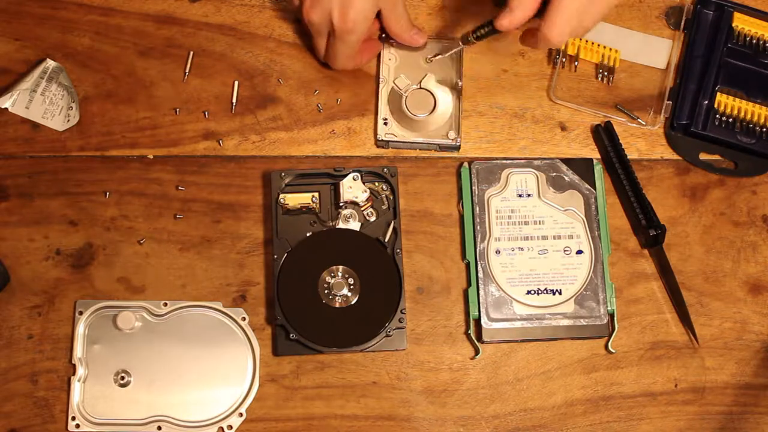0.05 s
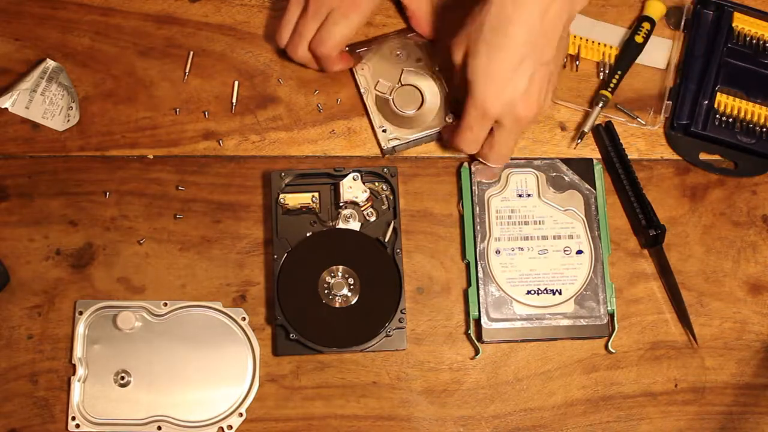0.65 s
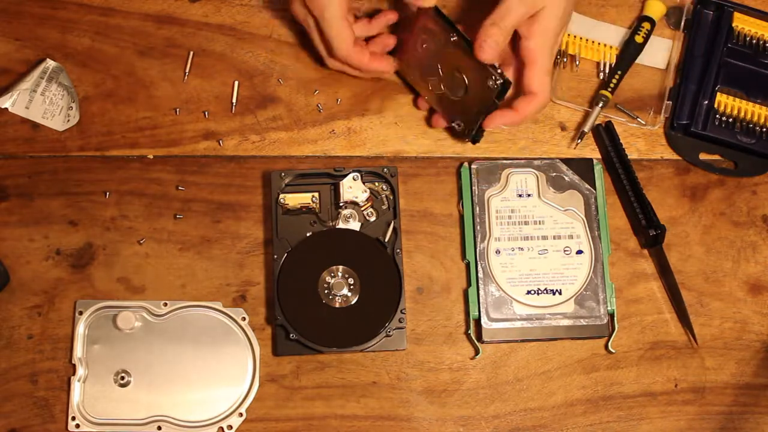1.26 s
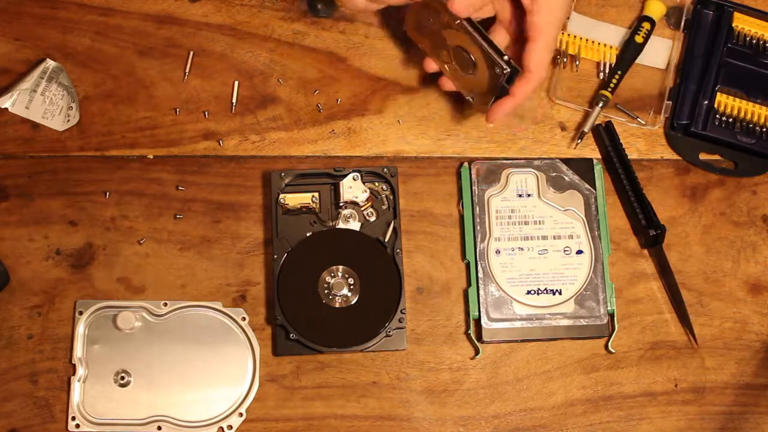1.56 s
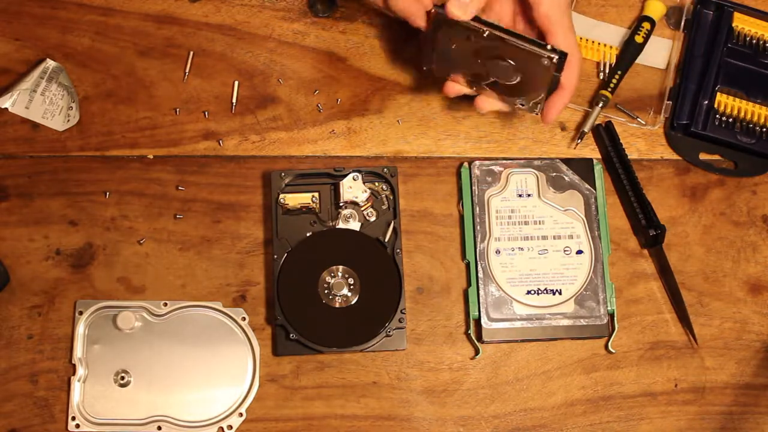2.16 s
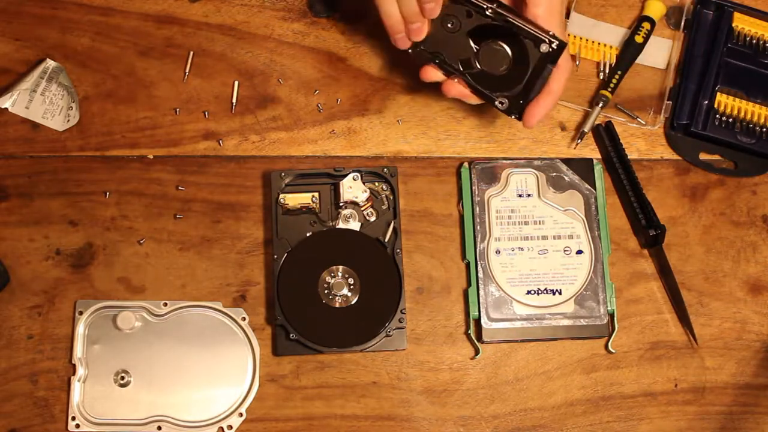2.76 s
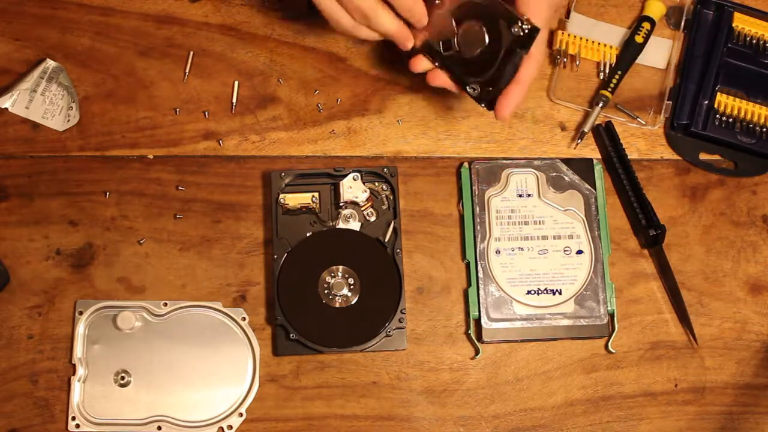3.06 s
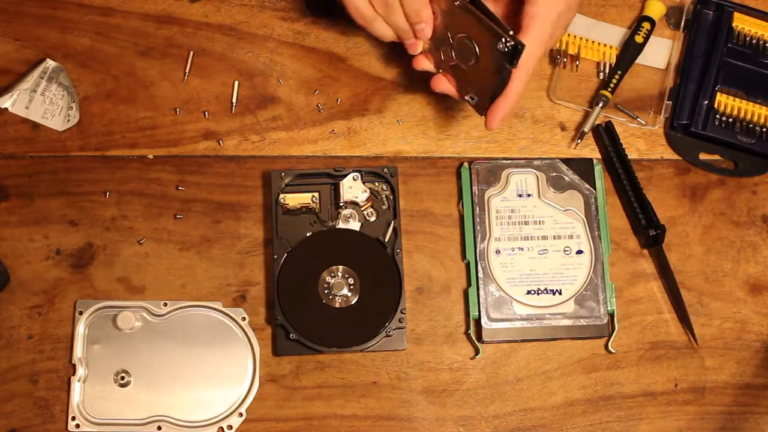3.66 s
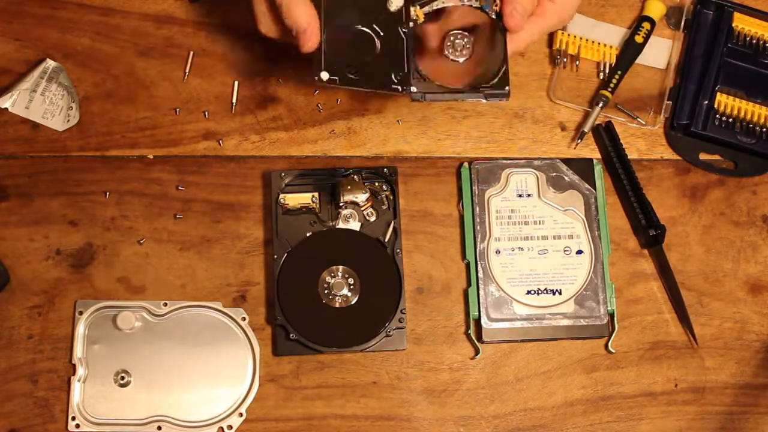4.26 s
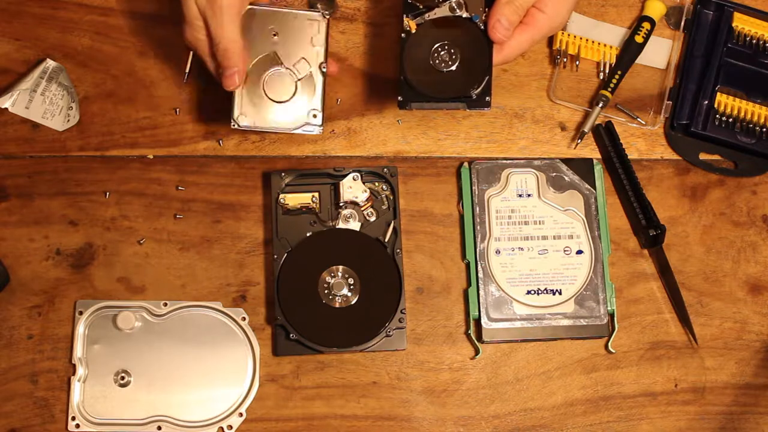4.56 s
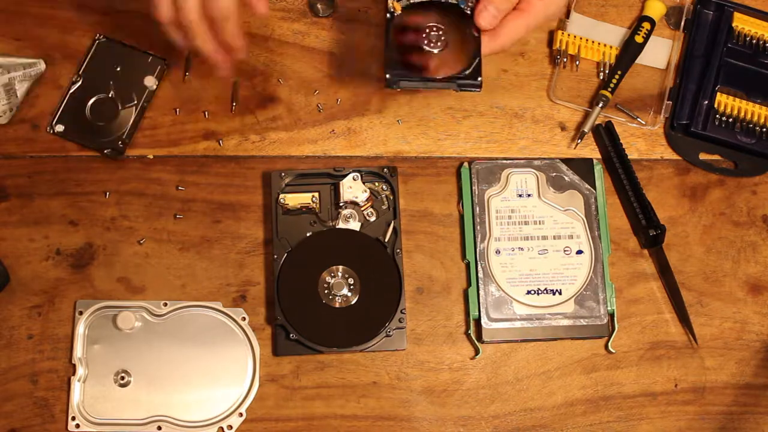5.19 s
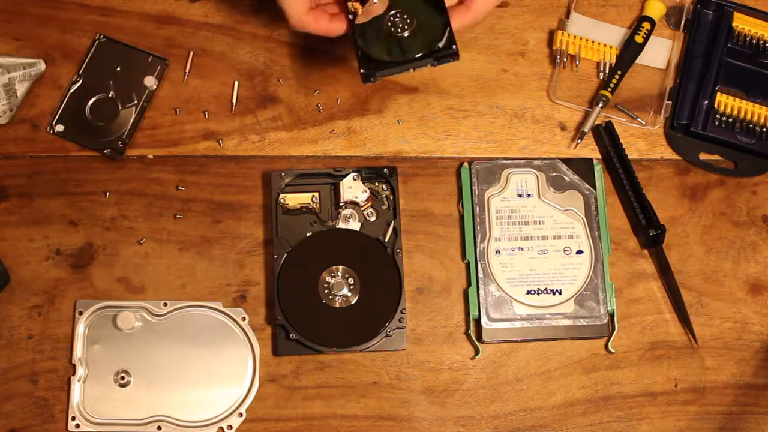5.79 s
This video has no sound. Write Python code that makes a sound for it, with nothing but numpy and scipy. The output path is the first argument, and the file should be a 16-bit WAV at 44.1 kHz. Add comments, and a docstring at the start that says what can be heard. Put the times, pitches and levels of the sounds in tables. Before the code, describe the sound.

Close taps, clicks and sharp snaps as a small disk drive is prised open, ending in a metallic clink over faint fan hum.

```python
"""Small room, wooden table, faint fan hum. A small screwdriver is put down and rattles on its bits.
A small disk drive is picked up, turned in the hands and its cover prised off with sharp snaps;
the thin metal cover is laid down and clinks. Each contact is a noise crack, a ping and the ringing
modes of the body; sliding is a dense run of tiny slips."""
import sys
import numpy as np
from scipy import signal
from scipy.fft import rfft, irfft
from scipy.io import wavfile
from scipy.ndimage import uniform_filter1d

SR = 44100
rng = np.random.default_rng(int(sys.argv[2]) if len(sys.argv) > 2 else 0)


def digitize_waveform(pressure):
    """Quantize a signal to 16-bit integers and store it at the path in sys.argv[1].

    Rows of a 2-D input are taken as channels; values are limited to [-1, 1].
    """
    field = np.atleast_2d(pressure).T
    bounded = np.clip(field, -1, 1)
    quanta = np.round(bounded * 32767).astype(np.int16)
    wavfile.write(sys.argv[1], SR, quanta)


N = 257103

# wooden table modes: f/Hz, level/dB, t60/s
TABLE_MODES = [(394, -3.5, 0.082), (650, -14, 0.06), (780, -17, 0.046), (1080, -1, 0.029),
               (1520, -3, 0.0083), (1720, -1.5, 0.034), (2690, 1, 0.02), (3240, 0, 0.017), (3995, -3, 0.04),
               (4870, -16, 0.049)]


def from_db(db):
    """Decibels to gain."""
    return 10 ** (np.asarray(db) / 20)


def rms_one(x):
    """Scale to rms 1."""
    return x / np.sqrt(np.mean(x ** 2) + 1e-20)


def decay(t, t60_s):
    """Exponential fall, 60 dB in t60_s."""
    return from_db(-60 * t / t60_s)


def butter(x, hz, kind="band", order=2):
    """Butterworth filter."""
    return signal.sosfilt(signal.butter(order, hz, kind, fs=SR, output="sos"), x)


def resonance(x, hz, width_hz):
    """Two-pole resonance, peak gain 1."""
    r = np.exp(-np.pi * width_hz / SR)
    feedback = [1, -2 * r * np.cos(2 * np.pi * hz / SR), r * r]
    return signal.lfilter(np.array([1, 0, -1]) * (1 - r * r) / 2, feedback, x)


def add(out, start_s, sound):
    """Mix a sound in at start_s."""
    at = round(start_s * SR)
    out[at:at + len(sound)] += sound[:N - at]


def balanced(x, levels_db, samples):
    """Set bass, mid and treble rms, taken over the first samples."""
    # bass, mid, treble: low/Hz, high/Hz
    bands = [(330, 2000), (2000, 6500), (6500, 17000)]
    parts = [butter(butter(x, edges), edges) for edges in bands]
    return sum(from_db(db) * part / np.std(part[:samples]) for db, part in zip(levels_db, parts))


def room_air():
    """Steady, smooth hiss at rms 1."""
    # air spectrum: f/Hz, relative density/dB
    spectrum = [(15, -62), (25, -24.5), (97, -22), (149, -7), (212, -15), (270, -2.5), (326, -11.5),
                (439, -12), (591, -15), (911, -8), (1130, -11.5), (1650, -9), (2000, -12.5), (4250, -13.5),
                (16000, -23)]
    points_hz, levels_db = np.transpose(spectrum)
    hz = np.maximum(np.fft.rfftfreq(N, 1 / SR), 1)
    gain = from_db(np.interp(np.log(hz), np.log(points_hz), levels_db))
    return rms_one(irfft(rfft(rng.standard_normal(N)) * gain, N))


def fan():
    """Fan noise through the narrow resonances of its housing."""
    # housing resonances: f/Hz, nominal width/Hz, level/dB
    peaks = [(142.6, 7.3, -68.5), (276.4, 27, -68.5), (421, 55, -72), (887, 73, -87), (1364, 33, -67.5),
             (1661, 20, -68.5), (1782.4, 30, -66), (2784, 57, -70.5)]
    out = np.zeros(N)
    for hz, width_hz, db in peaks:
        hum = resonance(rng.standard_normal(N), hz, 1.1 * width_hz)
        out += from_db(db) * rms_one(resonance(hum, hz, 1.1 * width_hz))
    return out


def drone(hz):
    """A faint low tone comes and goes."""
    # drone envelope: t/s, rms level/dB
    envelope = [(1.25, -92), (1.36, -69.5), (1.8, -63.5), (1.9, -76), (2.03, -68.5), (2.3, -61),
                (2.45, -95)]
    t = np.arange(N) / SR
    return from_db(np.interp(t, *np.transpose(envelope))) * np.sqrt(2) * np.sin(2 * np.pi * hz * t)


def room_reverb(x, early_db, early_t60_s, late_db):
    """Near echoes, quick scatter from clutter, then a short tail that dies first in the treble."""
    # room tail: f/Hz, t60/s, level/dB
    tail = [(398, .35, -3.5), (1190, 0.26, 3.5), (3430, 0.29, 0), (8100, 0.27, -4.5), (14900, 0.2, -4)]
    # echoes off the table and nearby things: t/s, level/dB
    echoes = [(.0045, -31), (.0085, -31), (0.01, -16.5)]
    t = np.arange(SR // 2) / SR
    response = np.zeros(len(t))
    edges_hz = np.geomspace(200, 18000, num=10)
    points_hz, t60s, levels_db = np.transpose(tail)
    for low, high in zip(edges_hz, edges_hz[1:]):
        log_centre = np.log(low * high) / 2
        t60_s = np.interp(log_centre, np.log(points_hz), t60s)
        db = np.interp(log_centre, np.log(points_hz), levels_db)
        fade = from_db(early_db) * decay(t, early_t60_s) + from_db(late_db) * decay(t, t60_s)
        response += from_db(db) * fade * butter(rng.standard_normal(len(t)), (low, high))
    response *= np.clip((t - .004) / .002, 0, 1)  # 4 ms pre-delay
    for delay_s, db in echoes:
        response[round(delay_s * SR)] += from_db(db)
    return signal.fftconvolve(x, response)[:N]


def sliding(grain_db, focus_db, wood_db, lift_s):
    """Tiny uneven slips swell, fade and stir the wood; less bass once the drive is lifted."""
    # fingers and parts sliding: start/s, end/s, mid level/dB, treble re mid/dB, favoured f/Hz
    rubs = [(0, 0.065, -49, 2, 4030), (0.322, 0.43, -51, -7, 3960), (0.696, .72, -51, -13, 1542),
            (0.859, 0.897, -52, -2, 2787), (1.063, 1.241, -57, 1, 3310), (1.489, 1.64, -56.5, 5, 10420),
            (3.181, 3.231, -54.5, -1.5, 4220), (3.537, 3.88, -64, 3, 4800), (3.886, 3.914, -37, -8.5, 4750),
            (4.203, 4.26, -53.5, -11, 5200), (4.845, 4.892, -68.5, 18, 9300)]
    out = np.zeros(N)
    for start_s, end_s, db, treble_db, pitch_hz in rubs:
        n = round((end_s - start_s) * SR)
        noise = rng.standard_normal(n)
        grain = rms_one(uniform_filter1d(rng.standard_normal(n), size=60))
        slips = noise * from_db(grain_db * grain)
        focus = resonance(slips, pitch_hz, width_hz=.17 * pitch_hz)
        wood = sum(from_db(mode_db) * resonance(slips, hz, 5 / t60) for hz, mode_db, t60 in TABLE_MODES)
        rub = slips + from_db(focus_db) * focus + from_db(wood_db) * wood
        rub *= signal.windows.tukey(n, .5)
        bass_db = -1.5 if start_s < lift_s else -19
        bass_db -= 8.5 * np.log2(pitch_hz / 4000)  # a lower, heavier scrape has more bass
        add(out, start_s, balanced(rub, (db + bass_db, db, db + treble_db), samples=n))
    return out


def bouncing(rows, bounces=2, loss_db=7, gap_ratio=.9, rebound_t60_s=.0088):
    """One row per contact; gaps over 2 ms add crisp rebounds, each weaker and sooner."""
    contacts = []
    for at_s, db, treble_db, t60_s, ping_hz, ping_db, gap_s in rows:
        contacts.append((at_s, db, treble_db, t60_s, ping_hz, ping_db))
        for k in range(bounces if gap_s > .002 else 0):
            at_s += gap_s * gap_ratio ** k
            contacts.append((at_s, db - (k + 1) * loss_db, treble_db, rebound_t60_s, ping_hz, ping_db))
    return contacts


def strikes(contacts, modes, colour, ring_db, lowest_hz, soft_hz, rise_s, bass_db, bass_db_per_db,
            ping_width_hz):
    """Each contact cracks, pings and rings the body's modes; harder means more treble, less bass."""
    out, t = np.zeros(N), np.arange(SR // 8) / SR
    for at_s, db, treble_db, t60_s, ping_hz, ping_db in contacts:
        force = (decay(t, t60_s) + decay(t, .0025)) * (1 - np.exp(-t / rise_s))
        crack = rng.standard_normal(len(t)) * force
        ping = np.sin(2 * np.pi * ping_hz * t) * np.exp(-np.pi * ping_width_hz * t)
        ping *= np.linalg.norm(crack) * 2 * np.pi * ping_width_hz / SR  # peak level with crack spectrum
        sound = crack + from_db(ping_db) * ping
        for hz, width_hz, hump_db in colour:
            sound += (from_db(hump_db) - 1) * resonance(sound, hz, width_hz)
        for hz, mode_db, mode_t60_s in modes:
            strength = from_db(mode_db + ring_db + rng.normal(0, .48)) * rng.choice([-1, 1])
            sound += strength * np.sin(2 * np.pi * hz * t) * decay(t, mode_t60_s)
        sound = butter(sound, soft_hz, "low")  # soft contact: little treble
        sound = butter(sound, lowest_hz, "high", order=4)  # small body: little bass
        levels_db = (db + bass_db + bass_db_per_db * treble_db, db, db + treble_db)
        add(out, at_s, balanced(sound, levels_db, samples=SR // 200))
    return out


def finger_ticks(start_s, end_s, per_s):
    """Contact rows: fingers tick faintly on the case at random moments."""
    treble_db, t60_s, ping_hz, ping_db = -1, .012, 4560, 13
    draws = rng.uniform(-1.1, 1, (round(per_s * (end_s - start_s)), 2))
    return [(start_s + (end_s - start_s) * (when + 1) / 2, db, treble_db, t60_s, ping_hz, ping_db)
            for when, db in draws + (0, -57)]  # about -57 dB


def table_taps():
    """Screwdriver and drive knock on the table; the wood rings."""
    # knocks: t/s, mid level/dB, treble re mid/dB, crack t60/s, ping f/Hz, ping/dB, bounce gap/s
    knocks = [(0.0237, -38.5, 0, 0.012, 2800, 10, 0.00038), (0.0424, -37.5, -13, 0.02, 3670, 18, 0.00057),
              (0.0565, -35, -6.5, 0.011, 4080, 14, 0), (0.0927, -50, 1, .012, 2730, 13, 0.00039),
              (0.1585, -45.5, -8, .036, 1680, 19, 0), (0.1718, -42, -15, .007, 2680, 15, 0.0005),
              (0.4304, -34.5, 3, .0086, 5500, 14, 0.0017), (0.4717, -33, -11, .075, 4238, 7, 0.00041),
              (0.4782, -38, 1, .007, 8800, 8, 0), (0.4828, -28.5, 3.5, 0.042, 8526, 10, 0.0018),
              (0.4925, -35, 6, .0083, 9780, 14, .015), (0.5318, -39, 14, .06, 9800, -9, 0),
              (0.5376, -32, 7, .028, 9600, 8, .018), (0.6982, -45.5, -3, 0.023, 700, 13, 0.0021),
              (0.7349, -44.5, -6, .017, 4220, 9, 0.00015), (0.7743, -41, -15, 0.019, 2730, 16, 0.00032),
              (0.8788, -24.5, -8, 0.019, 3280, 5.5, 0)]
    # humps and hollows in the table's radiation: f/Hz, width/Hz, gain/dB
    colour = [(482, 120, -7.5), (665, 190, 0), (1076, 150, 8), (3220, 910, 0.5), (2170, 1300, -3.5),
              (7200, 1800, -3.5), (9250, 1600, 1), (14900, 1200, 5.5)]
    return strikes(bouncing(knocks), TABLE_MODES, colour, ring_db=-14.5, lowest_hz=374, soft_hz=8500,
                   rise_s=.00022, bass_db=-10.5, bass_db_per_db=-.22, ping_width_hz=250)


def cover_clinks():
    """The loose metal cover lands, rocks and rings brightly."""
    # clinks: t/s, mid level/dB, treble re mid/dB, crack t60/s, ping f/Hz, ping/dB, bounce gap/s
    clinks = [(5.1072, -24, 3.6, 0.014, 10150, 24, 0.00083), (5.1681, -41, 6.4, .015, 9500, 19, .019),
              (5.2012, -38.5, 22.7, 0.0091, 11900, 8, 0), (5.2046, -35.5, 16.8, .0052, 11930, 21, 0),
              (5.2192, -51.5, 26.6, 0.039, 8830, 42, 0), (5.2286, -40, 9.6, .016, 9970, 9, 0.0015)]
    # cover modes: f/Hz, level/dB, t60/s
    modes = [(1455, -4, 0.028), (2430, -19.5, 0.068), (3300, -14, 0.14), (3440, -4, 0.038),
             (4570, -21, 0.16), (5560, -5.5, 0.044), (8030, -4, 0.074), (8230, 2, 0.038),
             (8700, 1.5, 0.069), (8400, -13, .05), (9700, -12, .05), (10250, 5.5, 0.055), (11300, -5, .06),
             (11950, 7, 0.044), (12500, 0, 0.049), (12500, -14, .06), (12900, -13, .05), (15100, 1, .05)]
    # cover radiation: f/Hz, width/Hz, gain/dB
    colour = [(1940, 460, -15), (6460, 2300, -6), (15300, 2200, 2)]
    return strikes(bouncing(clinks), modes, colour, ring_db=-15.5, lowest_hz=1110, soft_hz=14000,
                   rise_s=.00018, bass_db=-16, bass_db_per_db=-.22, ping_width_hz=64)


def case_snaps():
    """The drive case clicks in the hands and snaps as its cover is prised off."""
    # snaps: t/s, mid level/dB, treble re mid/dB, crack t60/s, ping f/Hz, ping/dB, bounce gap/s
    snaps = [(1.0231, -38, -2, 0.013, 3300, 14, 0.0011), (1.0417, -43, -4, 0.073, 4180, 7, 0),
             (1.1248, -41.5, 5, .013, 6300, 4.4, 0.00046), (1.2294, -40, -2, 0.0068, 2730, 15, 0.02),
             (1.2442, -45.5, 11, 0.0053, 11200, 6, 0.014), (1.302, -49.5, 7, 0.017, 10100, 6.3, .0207),
             (1.6234, -49.5, 1, 0.0082, 3320, 9, 0), (1.8617, -48.5, -4.5, 0.0061, 4250, 19, 0),
             (2.1711, -55, 4, 0.039, 10400, 8, 0), (2.2498, -48.5, -11, .006, 4400, 19, 0),
             (2.4804, -40.5, -1.5, .022, 3400, 16, 0.0012), (2.8157, -47, -9, .022, 3730, 8.14, 0),
             (2.8323, -22.5, -5, 0.011, 4550, 16.3, 0), (3.0158, -29.5, -6, 0.0077, 4700, 11.3, 0),
             (3.0269, -34.5, -15, 0.011, 4500, 13, 0.0017), (3.2943, -46.5, 0, 0.021, 4630, 12, 0.00015),
             (3.3683, -53, 0, 0.0059, 4500, 12, 0), (3.5785, -50.5, -3, 0.012, 4940, 21, 0.00064),
             (3.7974, -50.5, -0.5, 0.027, 4930, 15, 0), (3.9179, -48, 6, 0.026, 10040, 10, 0.00085),
             (3.9248, -28.5, 5, .0085, 5000, 4.6, 0), (4.1618, -52.5, 10.5, .0085, 14170, 18, 0.024),
             (4.3736, -46, -1, .03, 5126, 16, 0.00084), (4.3781, -42, 3.5, .035, 8510, 16, .013),
             (4.4212, -50.5, 3, .034, 8050, 16, 0.002)]
    # case modes: f/Hz, level/dB, t60/s
    modes = [(1500, 3, 0.033), (2880, -29, .02), (3130, -27, 0.023), (4000, 8, 0.019), (4280, 9, 0.021),
             (4650, -12, 0.031), (5250, -4, 0.027), (5730, 4, 0.027), (8300, -5, 0.033),
             (10000, -10, 0.024), (11000, -1, 0.033)]
    # case radiation: f/Hz, width/Hz, gain/dB
    colour = [(2180, 500, 2), (4430, 600, 3.5), (7330, 3000, -7), (10400, 1800, 2), (15300, 1200, 0)]
    contacts = bouncing(snaps) + finger_ticks(start_s=1.3, end_s=3.9, per_s=2.5)
    return strikes(contacts, modes, colour, ring_db=-26, lowest_hz=950, soft_hz=9500,
                   rise_s=.0004, bass_db=-20.5, bass_db_per_db=-.2, ping_width_hz=380)


def scene():
    """Close handling sounds and their reverb over the room's background; mono."""
    background = from_db(-54.77) * room_air() + from_db(-.5) * fan() + drone(hz=168.2)
    rubs = from_db(-5) * sliding(grain_db=3, focus_db=27, wood_db=13, lift_s=1)
    taps = table_taps()
    clinks = cover_clinks()
    snaps = case_snaps()
    send = from_db(-.5) * taps + from_db(-2.5) * snaps + from_db(1.7) * clinks + from_db(-7.5) * rubs
    reverb = room_reverb(send, early_db=-33, early_t60_s=.097, late_db=-36.5)
    return (background + reverb + rubs + taps + clinks + snaps)[None]


def record(dry):
    """Steep low-pass at 16.2 kHz, plus the converter's small DC offset."""
    return signal.sosfilt(signal.ellip(10, .1, 80, 16200, fs=SR, output="sos"), dry) + .001


dry = scene()
out = record(dry)
digitize_waveform(out)
```